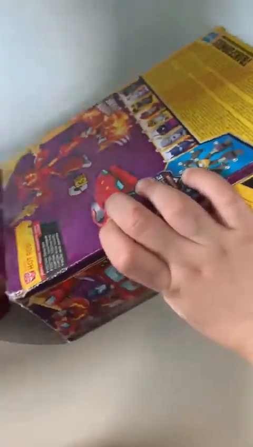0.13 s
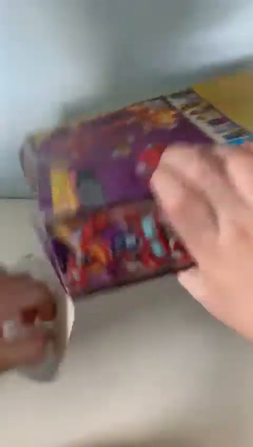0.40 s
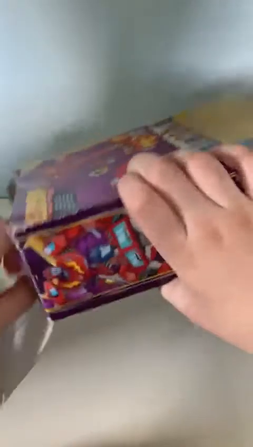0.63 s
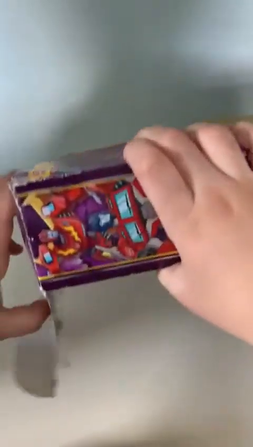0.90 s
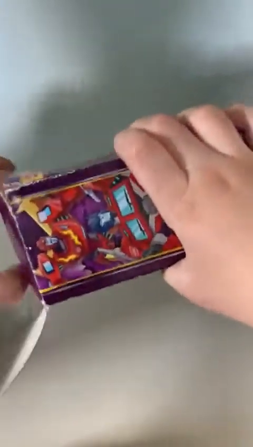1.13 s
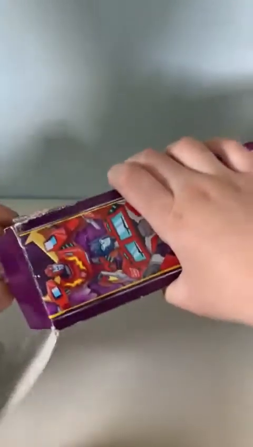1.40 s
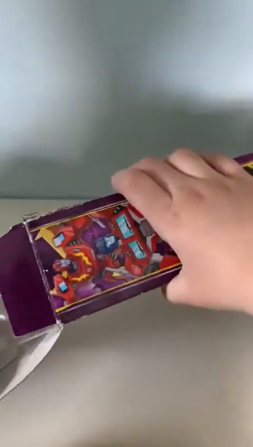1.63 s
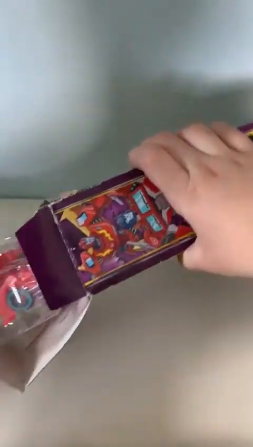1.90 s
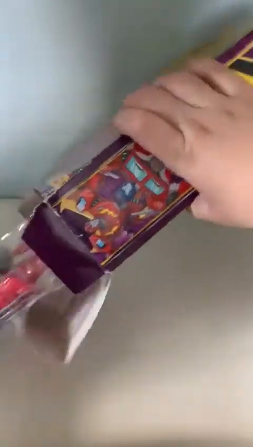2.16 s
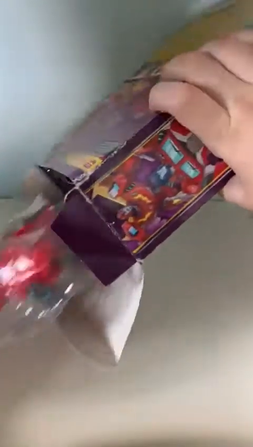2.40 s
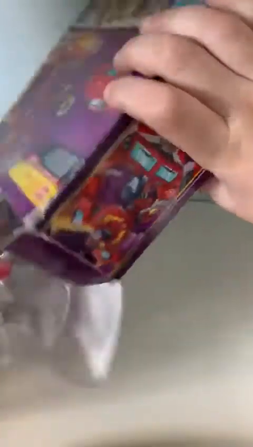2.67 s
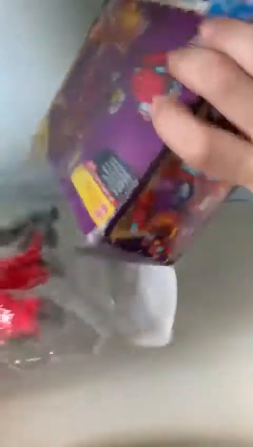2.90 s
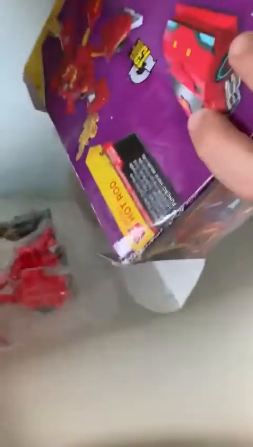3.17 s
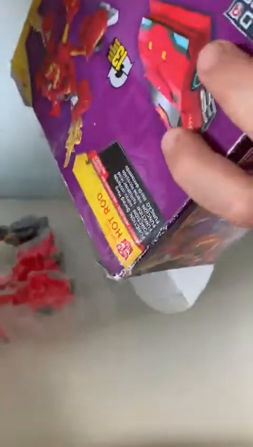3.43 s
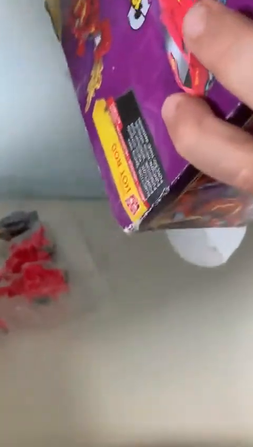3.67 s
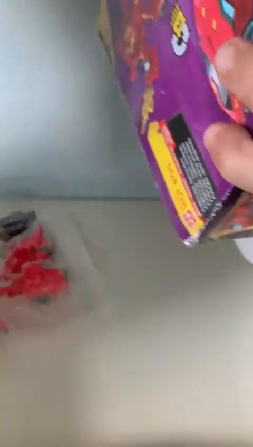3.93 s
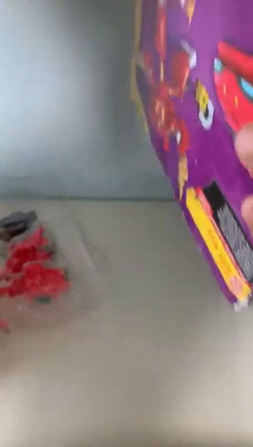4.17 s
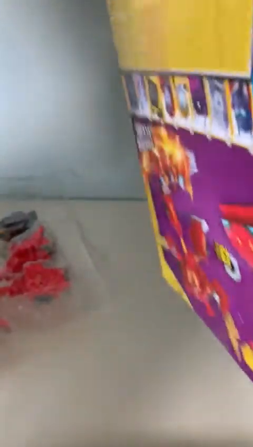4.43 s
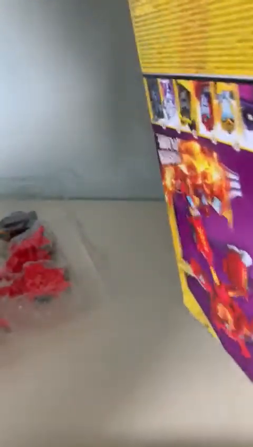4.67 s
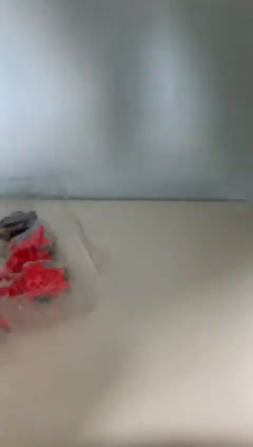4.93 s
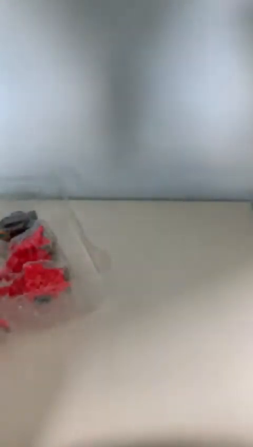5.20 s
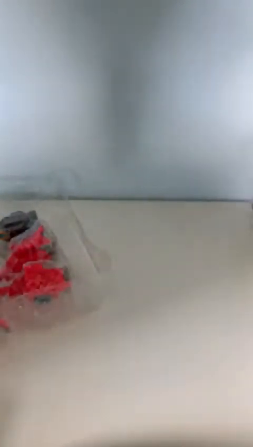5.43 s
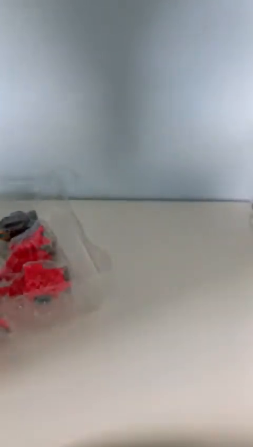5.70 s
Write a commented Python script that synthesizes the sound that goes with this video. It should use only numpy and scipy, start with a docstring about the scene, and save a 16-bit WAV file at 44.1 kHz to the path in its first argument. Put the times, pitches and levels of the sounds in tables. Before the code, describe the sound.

Hands wrestle open a hollow cardboard box with sharp crackling snaps, scraping card and crinkling plastic, then the noise thins to near silence.

```python
"""Unpacking a cardboard box

A cardboard box is opened by hand over a table and a clear plastic tray is pulled out of it.
Flaps and plastic snap in rushes of tiny slips, and knocks make the hollow box boom on its modes.
Card and fingers rub in clumped slips; bumps hum in the table and a low noise rumbles below.
Two spaced microphones hear the hands, mostly from the left first."""
import sys
import numpy as np
from scipy import signal
from scipy.fft import rfft, irfft, next_fast_len
from scipy.io import wavfile
from scipy.ndimage import uniform_filter1d, map_coordinates

SR = 44100
rng = np.random.default_rng(int(sys.argv[2]) if len(sys.argv) > 2 else 0)


def boost_factor(decibels):
    """Convert a level in decibels to a linear amplitude factor."""
    exponent = np.asarray(decibels, float) / 20
    return 10 ** exponent


def file_out(sig):
    """Save sig as 16-bit WAV at sys.argv[1]."""
    # one column per channel
    cols = np.atleast_2d(sig).T
    # limit, then scale
    lim = np.clip(cols, -1, 1)
    pcm = np.round(lim * 32767).astype(np.int16)
    wavfile.write(sys.argv[1], SR, pcm)


N = 256731  # length in samples

# Colour of the low rumble: pitch_hz, density_db (relative, per Hz)
RUMBLE_COLOUR = [(13, -39), (22, -21), (81, 0.5), (130, -7.5), (176, -20.5), (220, -9), (290, -39),
                 (480, -120)]
# Rumble before it wavers or is stirred: start_s, level_db
RUMBLE_LEVEL = [(0.0, -53), (0.44, -49), (1.94, -57), (2.88, -48), (3.45, -51.5), (4.8, -51), (5.02, -55),
                (5.25, -56), (5.82, -54.5)]
# Colour of the faint hiss: pitch_hz, density_db (relative, per Hz)
HISS_COLOUR = [(400, -8), (900, -10), (2000, -6), (6000, -5), (11500, -5)]
# Bumps of the table: start_s, peak_db, pitch_hz
TABLE_BUMPS = [(0.365, -31, 148), (0.742, -45, 75.4), (1.05, -40, 124), (1.25, -40, 56.5),
               (1.449, -35, 148), (1.797, -31, 148), (2.06, -37, 83.4), (2.184, -28, 110),
               (2.417, -31, 88.8), (2.706, -34, 56.5), (3.126, -35, 83.4), (3.311, -35, 56.5),
               (3.702, -34, 64.6), (4.441, -39, 121), (4.719, -40, 108), (5.535, -43, 75.4)]
# The box gliding over the table: start_s, level_db
GLIDE_LEVEL = [(4.36, -69), (4.378, -49), (4.418, -54), (4.48, -48), (4.536, -42.5), (4.6, -51),
               (4.63, -56), (4.66, -59), (4.7, -63)]
# Bands of the glide, before widening: pitch_hz, width_hz, level_db
GLIDE_RINGS = [(1910, 120, 0), (2760, 170, -3), (3480, 17, -3), (3960, 200, 0), (4870, 54, -1),
               (5960, 78, -8), (6220, 44, -8), (6840, 33, -14), (7700, 31, -10), (8210, 69, -5)]
# Hands moving card and plastic, before settling is added: start_s, rub_level_db, drum_level_db
SLIDE_LEVELS = [(0.0, -24.5, -26.5), (0.1, -56, -50.5), (0.3, -56, -42), (0.4, -42, -28), (0.46, -42, -31),
                (0.55, -54, -40), (0.7, -54, -39.5), (0.9, -52, -42), (0.99, -60, -48), (1.2, -54, -47),
                (1.42, -44, -38.5), (1.6, -33, -29), (1.7, -35, -30), (1.77, -38, -31), (1.82, -37, -30),
                (1.87, -32, -28), (1.91, -33, -30), (1.96, -34, -34), (2.04, -42, -51), (2.17, -22.5, -22),
                (2.215, -28.5, -26), (2.25, -42, -35), (2.31, -38, -33.5), (2.42, -27.5, -32.5),
                (2.545, -42, -38), (2.62, -38.5, -38), (2.74, -46, -42), (2.86, -38, -35),
                (2.905, -43, -36), (2.94, -35, -33), (2.98, -35.5, -29), (3.03, -40, -30), (3.07, -44, -32),
                (3.15, -52, -44), (3.24, -57, -52), (3.32, -42, -38), (3.4, -47, -40), (3.45, -46, -38),
                (3.52, -52, -45), (3.68, -57, -49.5), (4.02, -83.5, -72), (4.29, -75, -68),
                (4.358, -68, -66), (4.37, -56, -64), (4.4, -57, -63), (4.47, -57, -63), (4.54, -55, -66),
                (4.62, -62, -64), (4.74, -64.5, -54.5), (4.865, -73, -59), (4.885, -42.5, -52.5),
                (5.0, -81.5, -75), (5.15, -88, -80), (5.28, -76, -68), (5.33, -65, -68), (5.42, -66, -68),
                (5.5, -73, -66), (5.58, -68, -66), (5.65, -69, -67), (5.72, -65, -67), (5.79, -70, -68),
                (5.82, -61, -68)]
# Tone of the rubbing: start_s, fine_rasp_db (re the rub), dull_scuff_db (re the rub)
RUB_TONE = [(0, -2.5, -1.5), (.3, -2.5, -1.5), (.6, -2.5, -1.5), (.95, -2.5, -1.5), (1.2, -2.5, -3),
            (1.55, -1, -3), (1.75, -1, -1.5), (1.9, -1, 0), (2.1, -2.5, -1.5), (2.35, -2.5, -1.5),
            (2.7, -2.5, -2), (2.95, -2, 1), (3.15, -2.5, -3), (3.4, -2.5, -5), (3.9, -4, -5),
            (4.3, -2.5, -5), (4.7, -2.5, -3), (4.9, -2.5, -1.5), (5.3, -7, -4), (5.5, -5, -4),
            (5.82, -6, -5)]
# Colour of the rubbing: pitch_hz, density_db (relative, per Hz)
RUB_COLOUR = [(290, -31), (500, -5.5), (1190, -9), (1710, -13), (8760, -22.5), (10400, -18.5),
              (12200, -43.5), (15900, -66), (22000, -120)]
# Narrow resonant bands of the rubbing, before widening: pitch_hz, width_hz, level_db
RUB_RINGS = [(1420, 65, -1), (1680, 120, 0), (1950, 36, -3), (2770, 40, -6), (3320, 180, -6),
             (3910, 98, -6), (4440, 58, -7), (5100, 290, -8), (5940, 190, -10), (7180, 110, -12),
             (8280, 330, -11), (8660, 25, -17)]
# Modes of the box walls and cavity: pitch_hz, level_db (relative)
BOX_MODES = [(130, -19), (175, -30.5), (211, -2.5), (245, 1.5), (295, 1.5), (378, 2), (435, 9), (490, -0.5),
             (585, 0), (660, -6.5), (745, -0.5), (860, -4.5), (960, 2)]
# Knocks on the hollow box: start_s, peak_db, main_pitch_hz
KNOCKS = [(0.118, -24.5, 215), (0.164, -16.5, 253), (0.245, -28, 244.4), (0.365, -6.5, 218),
          (0.42, -6.5, 261.5), (0.516, -22, 231), (0.616, -38, 210), (0.659, -23.5, 244), (0.817, -23, 236),
          (0.895, -26, 213), (1.059, -25.5, 210), (1.262, -17, 348), (1.346, -20.5, 431.6),
          (1.467, -4, 433), (1.623, -13, 431), (1.719, -16.5, 439), (1.796, -18.5, 257), (1.867, -19, 439),
          (2.068, -6.5, 444), (2.178, -1.4, 579.3), (2.19, -7, 300), (2.421, -13, 444.7),
          (2.501, -26.5, 450), (2.588, -20, 213.7), (2.66, -24.5, 322.5), (2.863, -21, 427.5),
          (2.836, -26, 435), (2.975, -18, 250), (3.0, -22, 439), (3.06, -27, 439), (3.279, -20, 222.8),
          (3.308, -22, 400), (3.435, -24.5, 318), (3.699, -20, 268.2), (3.763, -13, 210.7),
          (3.816, -21, 212), (4.096, -44.5, 374), (4.162, -32, 330), (4.185, -33, 290), (4.437, -34, 277),
          (4.706, -31, 248), (4.806, -32, 244), (4.883, -31, 250), (5.628, -46.5, 207)]
# Snaps of flap and plastic: start_s, peak_db (middle band), low_mid_db and treble_db (re the middle),
# ring_hz (base pitch of the panel)
SNAPS = [(0.02, -20, -10, -2.5, 2820), (0.131, -17, -7.5, -2.5, 2900), (0.159, -8.5, -1.5, 7.5, 3870),
         (0.247, -21.5, 5.5, -0.5, 2460), (0.327, -31.5, 6.5, 11.5, 2350), (0.357, -2, -0.5, 5.5, 2770),
         (0.393, -14, 0, -6, 3000), (0.42, -5.5, 0.1, -3, 1480), (0.449, -10, -10.5, -4, 2870),
         (0.518, -31, 7.5, 0, 1240), (0.575, -24, -8, 1.5, 1600), (0.662, -29, 10.5, 5.5, 1720),
         (0.7, -29.5, -26, -24.5, 1480), (0.77, -34, 4, 4, 1740), (0.805, -15.5, -7, 1.1, 1950),
         (0.869, -30, -7, 4, 1530), (0.89, -26, -5, 5, 2600), (0.902, -26, -5, 5, 3800),
         (1.015, -40, -3, 0, 1640), (1.06, -37, -6, 5, 1680), (1.102, -16, -15, 0.5, 1600),
         (1.176, -40, 0, -4, 1660), (1.244, -34, 4, -6, 1050), (1.257, -20, 0, -4, 3600),
         (1.264, -3, -6.5, 5, 1500), (1.342, -4, -7, 0.75, 4330), (1.464, 0.5, -5, 0, 1850),
         (1.511, -12, -1.5, -1.5, 2900), (1.524, -5, -2.1, 7.5, 1460), (1.624, -19.5, -0.5, 3.5, 1630),
         (1.644, -16.5, -12.5, 2.5, 2640), (1.666, -20, -8, -5, 2800), (1.686, -22, -8, -8, 2700),
         (1.704, -24, -9, 1.5, 1440), (1.721, -9, 3.5, 4, 1330), (1.83, -21, 5, 0, 1670),
         (1.848, -21, 3, -4, 1500), (1.858, -23, 0, 0, 1700), (1.868, -10, 1, -4, 1690),
         (1.876, -17, 3, -4, 2500), (1.886, -22, 0, -2, 1700), (2.068, 3, -4.5, -7, 1960),
         (2.137, -8.5, 3.5, -2.5, 1440), (2.179, -9, 4, -8, 1500), (2.187, -7, 2, -8, 1600),
         (2.206, -9, -13.5, 7, 4540), (2.404, -15, -0.5, 0, 2743), (2.428, 2.4, -15, -0.3, 2000),
         (2.498, -16, -0.5, -3.5, 1630), (2.556, -9, -3, -6, 2710), (2.589, 1, -21, 0, 1830),
         (2.664, -23, 6.5, 3.5, 1660), (2.821, -26, -3.5, 1, 1660), (2.868, -20, 4, 2, 3200),
         (2.883, -24, 6, -4, 1700), (2.924, -24, 0, 5, 1650), (2.964, -17.5, 0.5, 2.3, 1730),
         (2.978, -16, 0, -3, 1720), (2.996, -22, 3, -5, 1700), (3.042, -26, -5, -6, 2700),
         (3.125, -37, -8, -4, 1320), (3.275, -3, -11, 5, 4850), (3.305, -22, 4, -4, 1100),
         (3.349, -25, -5, -8, 2940), (3.432, -24.5, 1.5, -14, 1175), (3.445, -26, -4, -8, 4300),
         (3.503, -36, 1, -4, 1260), (3.698, -23.5, 6, 1, 4450), (3.765, 0, -3, -2, 3800),
         (3.807, -17, -6.5, -1.5, 2390), (4.366, -42, -18, 8.5, 3690), (4.638, -33, -23, 9, 2060),
         (4.798, -22.5, -38, -1, 3140), (4.878, -34.5, -35, -12, 1180), (5.513, -46, -8, -0.6, 3140),
         (5.549, -52, -20, 8, 4500), (5.627, -31.5, -10.5, -20, 4610)]
# Partials of a snapped panel: multiple (of its ring pitch), level_db
PANEL_PARTIALS = [(1.0, -2.5), (1.9, -8.5), (3.3, -12.5)]
# Where the hands work: start_s, right_lag_ms (before it wanders), left_minus_right_db
HAND_PLACE = [(0, .46, 1), (1.4, .46, .5), (2, .46, .5), (2.7, .46, 1), (3.4, .46, 0), (3.6, .3, 1),
              (4.0, .02, -1), (4.3, .02, -1), (4.7, .02, 0), (5.82, .04, -.5)]
# Likeness of the two microphones: pitch_hz, common_share (of the power)
LIKENESS = [(60, .93), (150, 1), (500, .75), (1200, .4), (2200, .3), (3400, .5), (5000, .3), (7000, .4),
            (10000, .7)]
# Microphone colour: pitch_hz, width_hz, boost_db
MICROPHONE = [(1200, 300, -2), (5600, 2600, 2), (10400, 1500, 1)]


def rms_one(x):
    """Scale to rms 1."""
    return x / np.sqrt(np.mean(x ** 2) + 1e-20)


def top_one(x):
    """Scale to peak 1."""
    return x / np.abs(x).max()


def in_time(rows):
    """Columns of a curve at every sample."""
    s, *columns = np.transpose(rows)
    return [np.interp(np.arange(N) / SR, s, c) for c in columns]


def at_hz(points, hz):
    """Read a table on a log-frequency axis."""
    table_hz, values = np.transpose(points)
    return np.interp(np.log(hz), np.log(table_hz), values)


def band(x, low_hz, high_hz):
    """Butterworth band-pass."""
    return signal.sosfilt(signal.butter(2, [low_hz, high_hz], "band", fs=SR, output="sos"), x)


def ring(x, hz, t60_s):
    """Two-pole resonance: a unit click sets off a dying sine of height about 1."""
    r, w = boost_factor(-60 / (t60_s * SR)), 2 * np.pi * hz / SR
    return signal.lfilter([0, np.sin(w)], [1, -2 * r * np.cos(w), r * r], x + 1e-18)


def peak_filter(x, hz, width_hz):
    """One resonant band with gain 1 at its centre."""
    return signal.lfilter(*signal.iirpeak(hz, hz / width_hz, SR), x)


def resonate(x, rings, wider_hz):
    """Widened resonances side by side, fed in turn by two sources; rms 1."""
    total = 0
    for k, (hz, width_hz, db) in enumerate(rings):
        width_hz = width_hz + wider_hz
        total = total + boost_factor(db) * peak_filter(x[k % 2], hz, width_hz) / np.sqrt(width_hz)
    return rms_one(total)


def drift(rate_hz):
    """Slow random wander of spread 1, computed at every 40th sample."""
    r = np.exp(-80 * np.pi * rate_hz / SR)
    noise = rng.standard_normal(N // 40 + 2002)
    slow = signal.lfilter([1], [1, -2 * r, r * r], noise)[2000:]  # drop the filter's start-up
    return np.interp(np.arange(N) / 40, np.arange(len(slow)), rms_one(slow))


def grains(shape, per_s, spread_db):
    """Tiny slips at random moments, of uneven size and either sign."""
    sizes = boost_factor(spread_db * np.minimum(rng.exponential(1, shape), 4)) * rng.choice([-1, 1], shape)
    return sizes * (rng.random(shape) < per_s / SR) + 1e-9


def mix_paths(common, left, right, alike):
    """Blend a shared signal with one of each microphone's own, keeping the power."""
    return np.sqrt(alike) * common + np.sqrt(1 - alike) * np.array([left, right])


def two_paths(common, left, right, hz):
    """Blend the paths as alike as the microphones are at this pitch."""
    return mix_paths(common, left, right, at_hz(LIKENESS, hz))


def coloured(source, spectrum, low_hz, high_hz, patchy_db, count=6):
    """Bank of count bands an octave, fed in turn by two sources, each band wavering on its own; rms 1."""
    out = 0
    for k, low in enumerate(low_hz * 2 ** np.arange(0, np.log2(high_hz / low_hz), 1 / count)):
        hz = low * 2 ** (.5 / count)
        gain = boost_factor(at_hz(spectrum, hz) + patchy_db * drift(6))
        out = out + gain * two_paths(*band(source[k % 2], low, low * 2 ** (1 / count)), hz)
    return rms_one(out)


def with_settling(level_db, events, settle_db):
    """Add to a level the dying stir after every event, settle_db re the event's peak."""
    settle_s = 0.041
    kicks, r = np.full(N, 1e-18), np.exp(-2 / (settle_s * SR))
    for s, peak_db, *_ in events:
        kicks[round(s * SR)] = boost_factor(peak_db + settle_db) ** 2
    return 10 * np.log10(boost_factor(level_db) ** 2 + signal.lfilter([1], [1, -r], kicks))


def add(out, s, sound):
    """Mix a short sound in at time s."""
    at = round(s * SR)
    out[:, at:at + sound.shape[1]] += sound[:, :N - at]


def rumble():
    """Low unsteady noise of table and room, stirred by knocks."""
    waver_db, stir_db = 3.5, -45  # the stir is re the peak of the knock
    noise = coloured(rng.standard_normal((2, 3, N)), RUMBLE_COLOUR, 22, 200, patchy_db=1.5, count=3)
    level_db = in_time(RUMBLE_LEVEL)[0] + waver_db * drift(8.2)
    level_db = with_settling(level_db, KNOCKS, stir_db)
    return boost_factor(uniform_filter1d(level_db, size=900)) * noise


def hiss():
    """Faint room hiss: coloured noise at a constant overall level."""
    noise = coloured(rng.standard_normal((2, 3, N)), HISS_COLOUR, 500, 11500, patchy_db=2.5, count=2)
    return boost_factor(-79) * noise


def thumps():
    """A slow push sets the table top humming briefly, alike in both microphones."""
    push_s, t60_s = .004, .12
    out, t = np.zeros((2, N)), np.arange(9000) / SR
    push = t * np.exp(-t / push_s)
    for s, peak_db, hz in TABLE_BUMPS:
        hum = band(band(ring(push, hz, t60_s), 45, 250), 45, 250)
        add(out, s, boost_factor(peak_db) * top_one(hum) * np.ones((2, 1)))
    return out


def glide():
    """Smooth friction of the box's flat face on the table: noise in fixed resonant bands."""
    s = np.arange(N) / SR
    during = (s > GLIDE_LEVEL[0][0]) & (s < GLIDE_LEVEL[-1][0])
    friction = resonate(rng.standard_normal((2, 3, N)), GLIDE_RINGS, wider_hz=130)
    return boost_factor(in_time(GLIDE_LEVEL)[0]) * during * mix_paths(*friction, alike=.8)


def crinkles():
    """Lone small creases, each ringing a few cycles at one of 14 pitches; rms 1."""
    creases = grains(N, 450, 3.5) * boost_factor(3.0 * drift(30))
    pitches_hz = np.geomspace(900, 9000, 14)
    dealt = rng.integers(0, len(pitches_hz), N)
    rings = sum(ring(creases * (dealt == k), hz, 16.0 / hz + .004) for k, hz in enumerate(pitches_hz))
    return rms_one(band(rings, 470, 11000))


def sliding():
    """Clumped slips of card on card: they rasp, crinkle, sound in narrow bands and drum on the box modes."""
    settle_rub_db, settle_drum_db = -25.5, -16.5  # re the peak of the snap or knock
    smooth_below_db, smooth_span_db = -15, 14.5  # drumming re the rub
    clump_db, crinkle_db, rings_db = 2.5, -7.5, -4  # each at full creasing
    rasp_follows, scuff_from_box = 0.95, 0.45

    # After a snap or knock the card goes on shifting.
    rub_db, drum_db = in_time(SLIDE_LEVELS)
    rub_db = with_settling(rub_db, SNAPS, settle_rub_db)
    drum_db = with_settling(drum_db, KNOCKS, settle_drum_db)

    # Fine rasp swings a little less than the rub; dull scuff leans from the rub towards the drumming.
    rasp_re_db, scuff_re_db = in_time(RUB_TONE)
    rasp_db = rasp_re_db + rub_db.mean() + rasp_follows * (rub_db - rub_db.mean())
    scuff_db = scuff_re_db + rub_db + scuff_from_box * (drum_db - rub_db)

    # Drumming far under the rub means a flat face gliding, free of creases.
    creased = np.clip((drum_db - rub_db - smooth_below_db) / smooth_span_db, 0, 1)
    slips = grains((2, 3, N), 5500, 3.3) * boost_factor(clump_db * creased * drift(50))

    scuff = coloured(slips, RUB_COLOUR, 600, 1400, patchy_db=3.5, count=4)
    rub = coloured(slips, RUB_COLOUR, 1500, 3800, patchy_db=4.0)
    rub = rub + boost_factor(crinkle_db) * creased * crinkles()
    rings = two_paths(*resonate(slips, RUB_RINGS, wider_hz=5), 3000)
    rub = rms_one(rub + boost_factor(rings_db) * creased * rings)
    rasp = coloured(slips, RUB_COLOUR, 4000, 11500, patchy_db=3.5, count=5)
    drum = 0
    for k, (hz, db) in enumerate(BOX_MODES):
        drum = drum + boost_factor(db + 4 * drift(7)) * two_paths(*ring(slips[k % 2], hz, 0.08), hz)
    drum = rms_one(band(drum, 110, 820))
    return boost_factor(rub_db) * rub + boost_factor(rasp_db) * rasp + boost_factor(scuff_db) * scuff + boost_factor(drum_db) * drum


def knocks():
    """A soft push of some ms rings the box; modes near the pitch of the knock ring most."""
    push_s, soft_push_s_per_db = 0.0044, 0.00012  # gentle knocks press longer
    out, t = np.zeros((2, N)), np.arange(6000) / SR
    for s, peak_db, pitch_hz in KNOCKS:
        swell = t * np.exp(-t / (push_s - soft_push_s_per_db * peak_db))
        push = rng.standard_normal((3, len(t))) * swell
        sound = 0
        for hz, db in BOX_MODES:
            mode_db = db + rng.normal(0, 3) - 22 * abs(np.log2(hz / pitch_hz))
            t60_s = 0.075 * (300 / hz) ** 0.12
            sound = sound + boost_factor(mode_db) * two_paths(*ring(push, hz, t60_s), hz)
        sound = band(sound, 180, 1000)  # light walls send out no deep bass
        add(out, s - .002, boost_factor(peak_db) * top_one(sound))
    return out


def snaps():
    """A buckle creeps, cracks and lets go in a rush of slips; the panel rings near one pitch."""
    rush_ms, soft_rush_ms_per_db = 7.3, 0.035  # weaker buckles are over sooner
    swell_ms, fall_shape = 1.2, 1.45
    lead_in_db, lead_in_slope_db, crack_db = -9, 19, 12.5  # slope per rush length
    loose_db, stray_db = 1.5, -7  # unpitched share; stray rings of the panel
    panel_t60_s, treble_fall_db_per_s = 0.013, 80  # the treble of a snap dies sooner
    lead_s = .02
    out, t = np.zeros((2, N)), np.arange(4400) / SR - lead_s
    after = np.maximum(t, 0)
    for s, peak_db, low_db, top_db, hz in SNAPS:
        part = t * 1000 / (rush_ms + soft_rush_ms_per_db * peak_db)
        fall = np.exp(-np.maximum(part, 0) ** fall_shape) * (1 - .45 * np.exp(-after * 1e3 / swell_ms))
        creep = boost_factor(lead_in_db + lead_in_slope_db * part)
        rush = np.where(t < 0, creep, fall + boost_factor(-16 - 300 * t))
        slips = grains((3, len(t)), 7000, 4.5) * rush
        slips[:, round(lead_s * SR)] += boost_factor(crack_db)  # the first crack

        rings = [(k * hz, db) for k, db in PANEL_PARTIALS if k * hz < 9e3]
        rings += [(1200 * 6 ** u, stray_db) for u in rng.random(3)]
        middle = boost_factor(loose_db) * top_one(band(slips, 1400, 6500))
        for ring_hz, db in rings:
            middle = middle + boost_factor(db) * top_one(ring(slips, ring_hz, panel_t60_s))
        low_mid = top_one(band(slips, 620, 1400))
        treble = top_one(band(slips * boost_factor(-treble_fall_db_per_s * after), 6300, 13000))
        sound = two_paths(*top_one(middle), 4300)
        sound = sound + boost_factor(low_db) * two_paths(*low_mid, 730)
        sound = sound + boost_factor(top_db) * two_paths(*treble, 8000)
        add(out, s - lead_s, boost_factor(peak_db) * sound)
    return out


def room(x):
    """Room echo: five feedback delays a side, duller on every round."""
    t60_s, wall_cut_hz = 0.41, 1600  # decay time before the walls dull it
    size = next_fast_len(N + SR // 4)
    hz, spectrum = np.fft.rfftfreq(size, 1 / SR), rfft(x, size)
    out = np.zeros((2, size // 2 + 1), complex)
    for k, lag_s in enumerate(rng.uniform(0.0082, .03, 10)):
        echo = boost_factor(-60 * lag_s / t60_s) / (1 + 1j * hz / wall_cut_hz) * np.exp(-2j * np.pi * hz * lag_s)
        out[k % 2] += echo / (1 - echo) * (-1) ** (k // 2)
    return irfft(spectrum * out, size)[:, :N]


def place_hands(near):
    """The hands shift about: delay the right microphone and tilt the balance."""
    lag_wander_ms = 0.06
    late_ms, pan_db = in_time(HAND_PLACE)
    late = (late_ms + lag_wander_ms * drift(4)) * SR / 1000
    near[1] = map_coordinates(near[1], [np.arange(N) - late], order=2, mode="nearest")
    return near * boost_factor(np.array([pan_db, -pan_db]) / 2)


def scene():
    """Background and table below, the work of the hands close by, and the room's echo of its hits."""
    background = rumble() + hiss() + thumps()
    hits = knocks() + snaps()
    near = place_hands(glide() + sliding() + hits)
    return background + near + boost_factor(-18) * room(hits.mean(0))


def boost(x, hz, width_hz, db):
    """Raise or dip one band by db at its centre."""
    return x + (boost_factor(db) - 1) * peak_filter(x, hz, width_hz)


def cut_top(x, hz):
    """A steep edge, then a second cut just above."""
    steep = signal.sosfilt(signal.ellip(6, .5, 28, hz, fs=SR, output="sos"), x)
    return signal.sosfilt(signal.cheby1(8, 1, hz + 500, fs=SR, output="sos"), steep)


def low_pass(x):
    """Removes everything above the highest recorded frequency."""
    return signal.sosfilt(signal.butter(12, 12390, fs=SR, output="sos"), x)


def record(dry):
    """Microphone colour, narrowed low range, treble dips in mid and side, cut top, rounded peaks."""
    for hz, width_hz, db in MICROPHONE:
        dry = boost(dry, hz, width_hz, db)
    mid, side = (dry[0] + dry[1]) / 2, (dry[0] - dry[1]) / 2
    side = side - .8 * signal.filtfilt(*signal.butter(1, (95, 480), "band", fs=SR), side)
    # The treble reaches the two ports opposed at one pitch, alike at another.
    mid = boost(mid, 8800, width_hz=1200, db=-26)
    side = boost(side, 10200, width_hz=2000, db=-20)
    mid, side = cut_top(mid, 11150), cut_top(side, 11800)
    both = np.array([mid + side, mid - side])
    return low_pass(np.tanh(both))


dry = scene()
out = record(dry)
file_out(out)
```